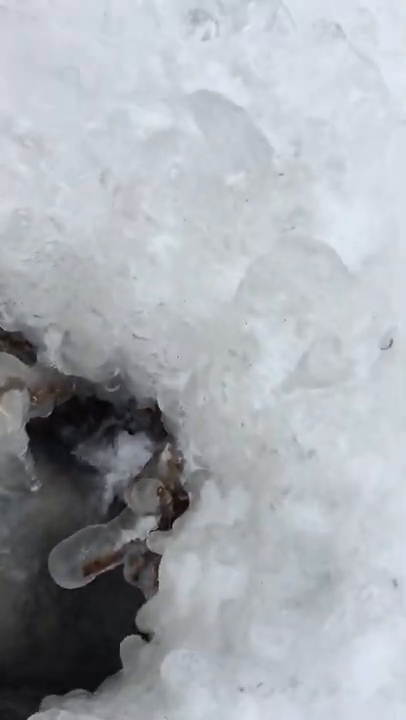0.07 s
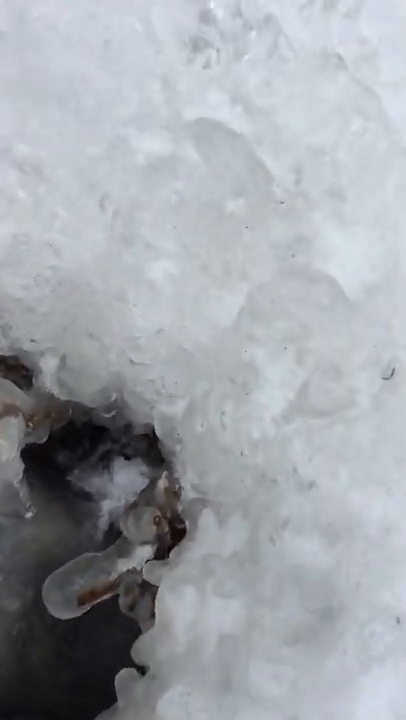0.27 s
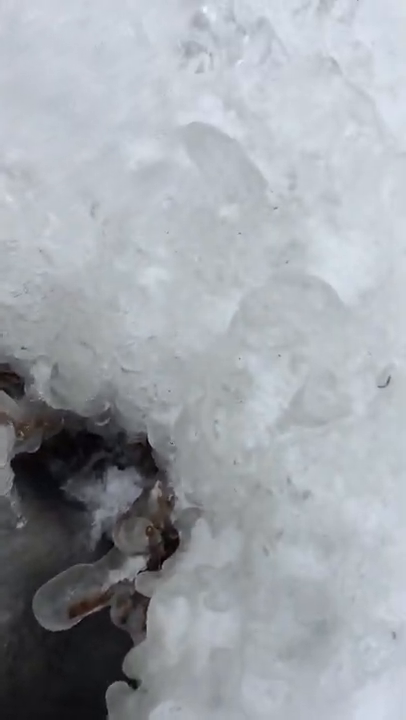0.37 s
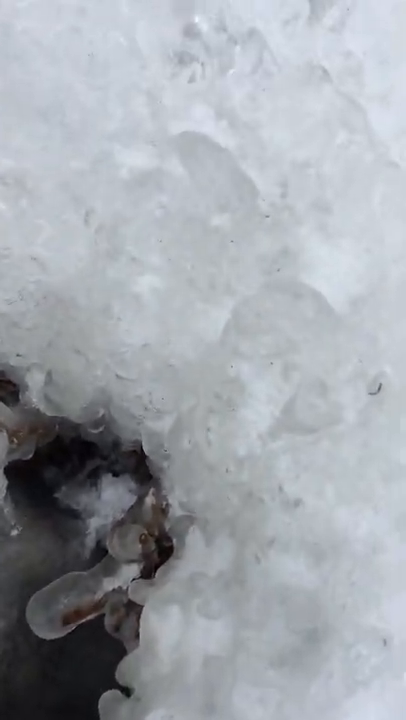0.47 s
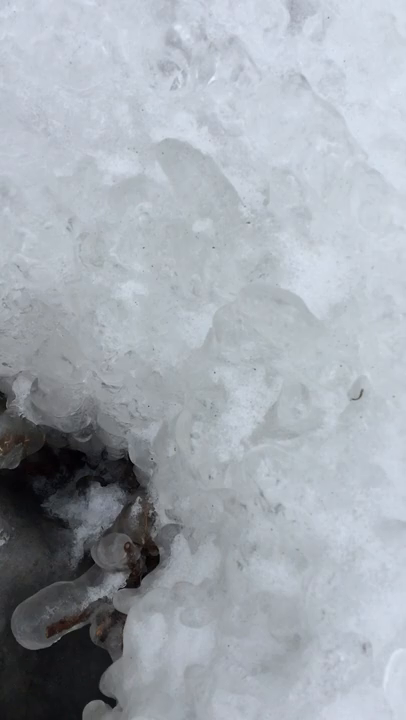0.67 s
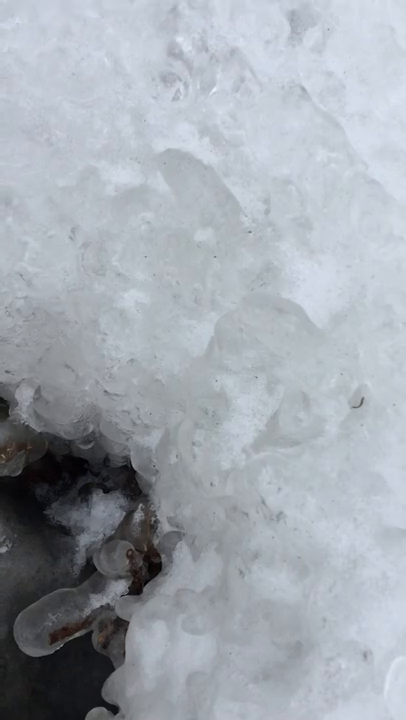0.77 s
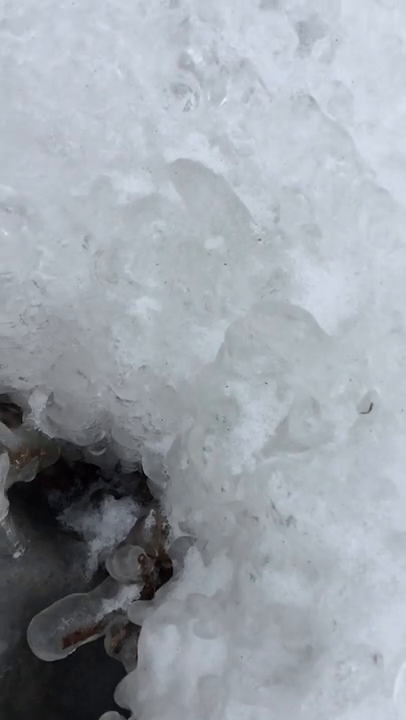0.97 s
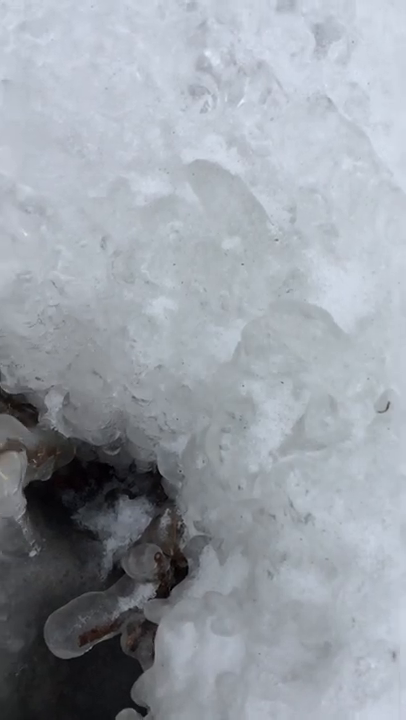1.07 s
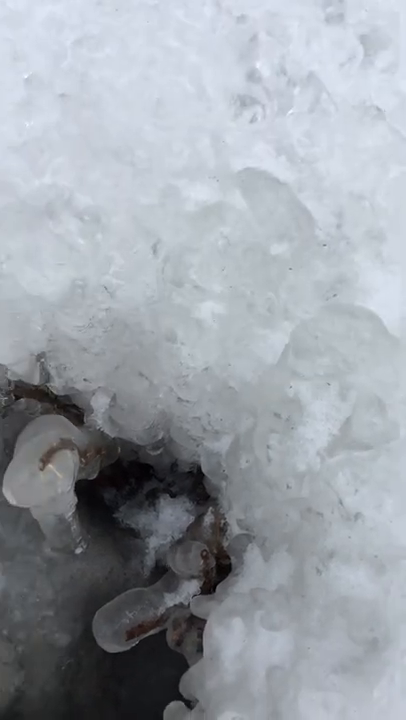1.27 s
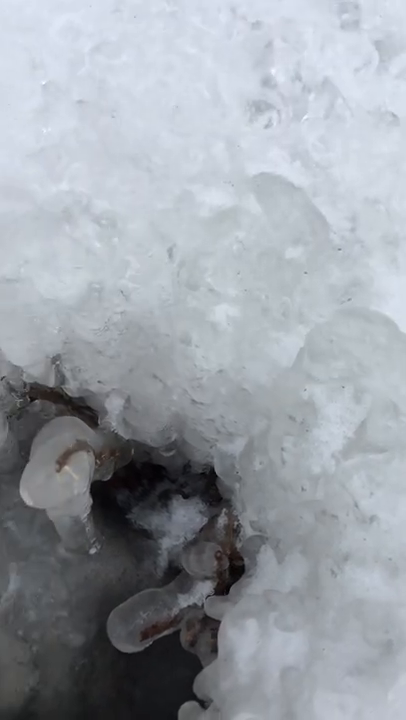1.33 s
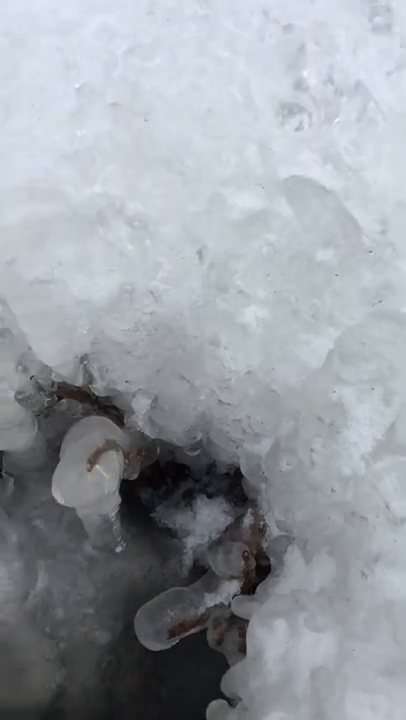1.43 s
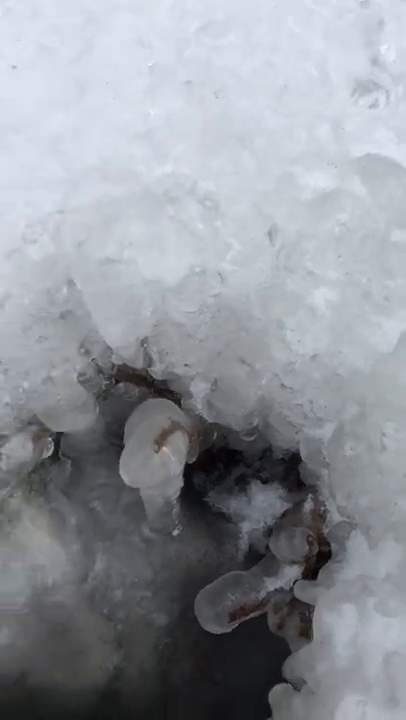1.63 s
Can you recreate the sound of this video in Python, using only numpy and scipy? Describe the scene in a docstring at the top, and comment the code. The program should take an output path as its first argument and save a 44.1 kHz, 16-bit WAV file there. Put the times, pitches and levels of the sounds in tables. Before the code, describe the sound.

Light wind rumbles and flutters on the microphone, with a few tiny ticks over faint hiss.

```python
"""Light wind brushes a hand-held microphone beside a bank of ice.
Turbulent pressure at the port is heard as a low rumble that follows the gusts, with spells of
higher flutter when they are strong and bumps from single eddies. Behind lie a few tiny ticks,
perhaps drips, specks of high fizz, soft friction of the hand, a far hum and a faint outdoor hiss."""
import sys
import numpy as np
from scipy import signal
from scipy.fft import rfft, irfft
from scipy.io import wavfile
from scipy.ndimage import uniform_filter1d

SR = 44100
rng = np.random.default_rng(int(sys.argv[2]) if len(sys.argv) > 2 else 0)


def output_pcm(signal):
    """Save a mono or channel-first signal as 16-bit PCM at the path in sys.argv[1].

    Samples are clipped to [-1, 1] before scaling.
    """
    pcm = np.clip(np.atleast_2d(signal).T, -1, 1) * 32767
    wavfile.write(sys.argv[1], SR, np.round(pcm).astype(np.int16))


N = 74970
T = np.arange(N) / SR


def wind_rumble():
    """Turbulence at the port makes low pressure fluctuations whose amplitude follows the gusts."""
    # Strength of the wind. Each row: time in seconds, rumble level in dB.
    gusts = [(0.0, -49), (0.05, -55.5), (0.13, -55), (0.165, -72), (0.20, -73), (0.22, -46), (0.30, -45.5),
             (0.375, -54.5), (0.43, -36), (0.53, -41.5), (0.565, -41), (0.635, -45), (0.66, -47.5),
             (0.83, -47), (0.87, -46), (0.97, -48), (1.02, -43), (1.13, -51.5), (1.17, -59), (1.28, -76),
             (1.315, -55), (1.42, -56.5), (1.6, -66.5), (1.7, -67)]
    # Spectrum of the rumble. Each row: frequency in Hz, relative spectral density in dB.
    spectrum = [(20, -24.5), (35, -6), (55, 1.5), (80, -2.5), (125, -8), (180, -18.5), (260, -32),
                (400, -45), (800, -75)]
    return level(gusts) * turbulence(spectrum, even_s=0.011)


def wind_flutter():
    """Faster flow shifts turbulence upward in frequency, heard as short spells of flutter."""
    # Spells of flutter. Each row: start in seconds, length in seconds, level in dB.
    spells = [(0.281, 0.03, -49), (0.403, 0.042, -38.5), (0.46, 0.024, -42), (0.489, 0.02, -39.5),
              (0.544, 0.095, -45.5), (0.776, 0.017, -54), (0.902, 0.024, -50)]
    # Spectrum of the flutter. Each row: frequency in Hz, relative spectral density in dB.
    spectrum = [(70, -30), (130, 4), (190, 3), (260, -15.5), (350, -9), (450, -24), (600, -33), (1000, -76)]
    edge_s = 0.0079
    envelope = np.zeros(N)
    for start, length, db in spells:
        inside_s = np.minimum(T - start, start + length - T)
        envelope += from_db(db) * np.clip(inside_s / edge_s + .5, 0, 1)
    return envelope * turbulence(spectrum, even_s=0.039)


def eddies():
    """A passing eddy is a Gaussian packet of pressure swings; small ones pass faster and sound higher."""
    # Eddies at the port. Each row: centre time in seconds, envelope peak in dB, frequency in Hz,
    # Gaussian half width in cycles.
    bumps = [(0.014, -49, 48, 0.54), (0.218, -40, 129, 1.13), (0.246, -39.5, 168, 0.49),
             (0.298, -31, 75, 0.73), (0.434, -27.5, 168, 0.42), (0.506, -34.5, 217, 0.59),
             (0.567, -31, 120, 1.4), (0.599, -26, 86, 0.52), (0.621, -29, 171.4, 0.43),
             (0.633, -26.5, 62, 0.44), (0.708, -43.5, 90, 1.1), (0.782, -30.5, 70.5, 0.63),
             (0.864, -38.5, 80, 1.17), (0.877, -32, 202, 0.33), (0.913, -35.5, 222, 0.35),
             (0.922, -34, 75, 0.57), (0.938, -36, 210, 0.42), (0.963, -45.5, 204, 0.53),
             (1.018, -34, 56.8, 0.81), (1.039, -40, 215, 0.52), (1.072, -38, 83, 0.34),
             (1.32, -48.5, 55.7, 0.89), (1.644, -42.5, 54, 0.32)]
    out = np.zeros(N)
    for (centre_s, db, hz, width), phase in zip(bumps, rng.random(len(bumps))):
        cycles = (T - centre_s) * hz
        envelope = from_db(db) * np.exp(-.5 * (cycles / width) ** 2)
        out += envelope * np.cos(2 * np.pi * (cycles + phase))
    return out


def ticks():
    """Impulse excitation gives a band-limited snap and two damped modes: a short ring, a lower knock."""
    # Tiny ticks. Each row: start in seconds, snap level in dB, ring level in dB,
    # ring frequency in Hz, knock level in dB.
    impulses = [(0.2830, -63, -76, 2400, -80), (0.433, -74, -57.5, 3140, -84),
                (0.6550, -67, -59, 3200, -74), (0.696, -70, -62, 2000, -67), (0.6985, -69, -63, 2900, -84),
                (0.9932, -54, -52, 3400, -55), (1.0487, -80, -61, 3560, -87)]
    snap_band = signal.butter(2, [1030, 2460], "band", fs=SR, output="sos")
    out = np.zeros(N)
    for start, snap_db, ring_db, ring_hz, knock_db in impulses:
        click = 1.0 * (np.arange(N) == int(start * SR))
        snap = signal.sosfilt(snap_band, click + 1e-18)
        out += from_db(snap_db) * snap / snap.max()
        out += from_db(ring_db) * damped_mode(click, ring_hz, t60_s=0.0027)
        out += from_db(knock_db) * damped_mode(click, hz=1400, t60_s=0.012)
    return out


def sprays():
    """Fine spray is heard as high band-limited noise in Gaussian bursts a few milliseconds long."""
    # Bursts of fizz. Each row: centre time in seconds, level in dB, centre frequency in Hz.
    bursts = [(0.6817, -70.5, 6550), (0.6978, -74, 6800), (0.993, -63, 11300), (1.047, -73, 6260),
              (1.6440, -64.5, 11100)]
    half_band_octaves, half_width_s = 0.17, 0.00055
    out = np.zeros(N)
    for centre_s, db, hz in bursts:
        edges_hz = hz * 2 ** np.array([-half_band_octaves, half_band_octaves])
        band = signal.butter(2, edges_hz, "band", fs=SR, output="sos")
        fizz = rms_one(signal.sosfilt(band, rng.standard_normal(N)))
        out += from_db(db) * np.exp(-.5 * ((T - centre_s) / half_width_s) ** 2) * fizz
    return out


def hand_rustles():
    """Friction of the hand makes broadband noise that rises fast and decays exponentially."""
    # Soft rubs. Each row: peak time in seconds, level in dB, decay time constant in seconds.
    rubs = [(0.282, -68, 0.0073), (0.297, -72.5, 0.047), (0.695, -69, 0.0087), (1.048, -75, .006)]
    # Spectrum of the friction. Each row: frequency in Hz, relative spectral density in dB.
    spectrum = [(800, -39), (2000, 9), (3500, -2.5), (6500, -3), (10000, -7), (16000, -8.5)]
    attack_s = 0.0038
    envelope = np.zeros(N)
    for peak_s, db, decay_s in rubs:
        envelope += from_db(db) * np.exp(-np.maximum((peak_s - T) / attack_s, (T - peak_s) / decay_s))
    return envelope * noise(spectrum)


def far_hum():
    """Slow random frequency modulation makes a distant pure tone waver slightly."""
    # Strength of the hum. Each row: time in seconds, level in dB.
    swell = [(0, -80.5), (0.88, -76.5), (1.0, -72), (1.35, -71), (1.7, -72)]
    pitch_hz, waver_hz = 410.8, 1.2
    drift = noise([(2, 0), (8, -6), (40, -60), (100, -120)])
    phase = 2 * np.pi * np.cumsum(pitch_hz + waver_hz * drift) / SR
    return level(swell) * np.sqrt(2) * np.sin(phase)


def outdoor_hiss():
    """Still air and microphone hiss form a stationary noise floor."""
    # Spectrum of the floor. Each row: frequency in Hz, relative spectral density in dB.
    spectrum = [(20, -4.5), (55, 5), (100, 2.5), (170, 1.5), (280, -6.5), (500, -12), (750, -13),
                (950, -12), (1500, -23), (2700, -30), (5000, -32), (9000, -34.5), (12500, -35.5),
                (16000, -39.5)]
    # Dips and one hump in it. Each row: centre in Hz, half width in Hz, gain in dB.
    contours = [(495, 33, -3), (903, 14, 4), (2750, 200, -2.5), (4910, 340, -3.5), (7500, 540, -2.5),
                (10400, 170, -13.5)]
    return from_db(-60) * noise(spectrum, contours)


def from_db(db):
    """Amplitude grows tenfold for every 20 dB."""
    return 10 ** (np.asarray(db) / 20)


def rms_one(x):
    """Division by the root mean square gives unit power."""
    return x / np.sqrt(np.mean(x ** 2) + 1e-20)


def level(curve):
    """Interpolation between (seconds, dB) points gives an amplitude envelope."""
    return from_db(np.interp(T, *np.transpose(curve)))


def noise(spectrum, contours=()):
    """Spectral shaping colours white noise, with optional Gaussian dips and humps, at unit power."""
    hz = np.maximum(np.arange(N // 2 + 1) * SR / N, 1)
    points_hz, points_db = np.transpose(spectrum)
    db = np.interp(np.log(hz), np.log(points_hz), points_db)
    for centre_hz, width_hz, gain_db in contours:
        db += gain_db * np.exp(-((hz - centre_hz) / width_hz) ** 2)
    gain = from_db(db) * (hz > points_hz[0] / 2)
    return rms_one(irfft(rfft(rng.standard_normal(N)) * gain, N))


def turbulence(spectrum, even_s):
    """Coloured noise divided by its running amplitude is steady over spans longer than even_s."""
    pressure = noise(spectrum)
    span = int(even_s * SR)
    power = uniform_filter1d(uniform_filter1d(pressure ** 2, span), span)
    return rms_one(pressure / np.sqrt(np.abs(power) + 0.003))


def damped_mode(click, hz, t60_s):
    """A struck resonator rings as a sine that falls by 60 dB in t60_s."""
    radius, angle = from_db(-60 / (t60_s * SR)), 2 * np.pi * hz / SR
    return signal.lfilter([0, np.sin(angle)], [1, -2 * radius * np.cos(angle), radius ** 2], click + 1e-18)


def scene():
    """The pressures of all sources add by superposition at one microphone."""
    background = far_hum() + outdoor_hiss()
    return (background + wind_rumble() + wind_flutter() + hand_rustles() + eddies() + ticks() + sprays())[None]


def record(dry):
    """The microphone acts as a band-pass filter: it loses the deepest bass and cuts the top steeply."""
    low_cut_hz, high_cut_hz = 29, 15700
    hz = np.maximum(np.arange(N + 1) * SR / (2 * N), 1)
    low_cut = 1 / np.sqrt(1 + (low_cut_hz / hz) ** 6)
    high_cut = 1 / np.sqrt(1 + (hz / high_cut_hz) ** 600)
    return irfft(rfft(dry, 2 * N) * low_cut * high_cut)[:, :N]


dry = scene()
out = record(dry)
output_pcm(out)
```